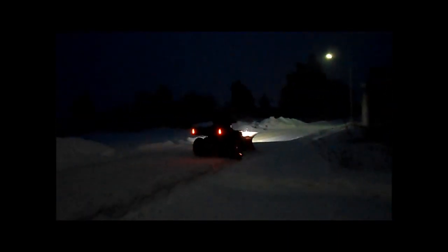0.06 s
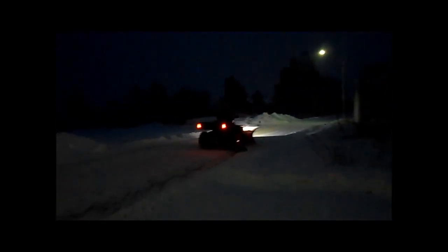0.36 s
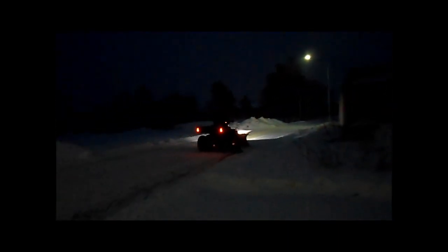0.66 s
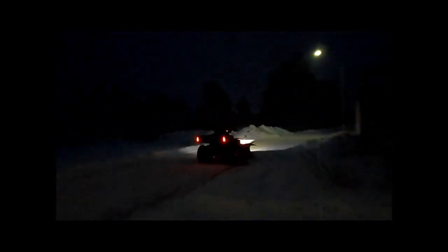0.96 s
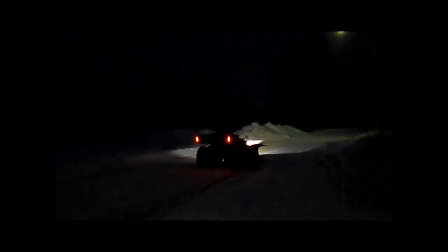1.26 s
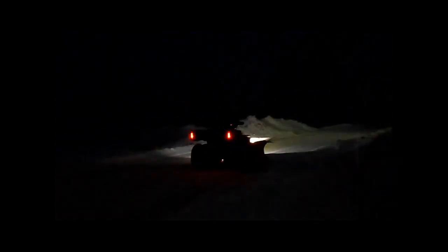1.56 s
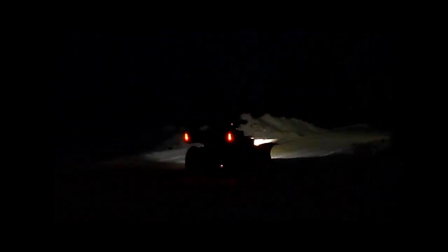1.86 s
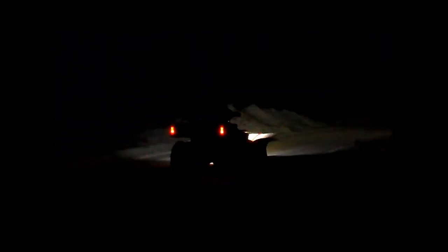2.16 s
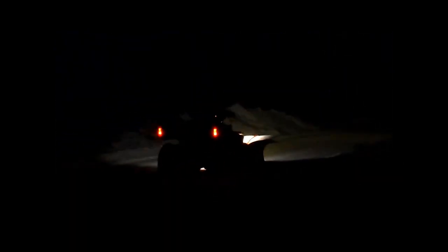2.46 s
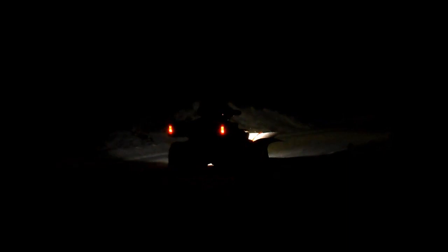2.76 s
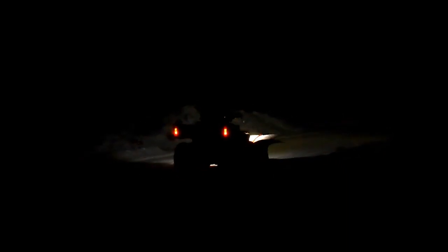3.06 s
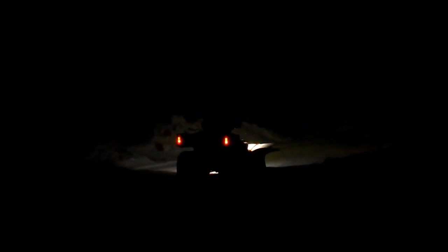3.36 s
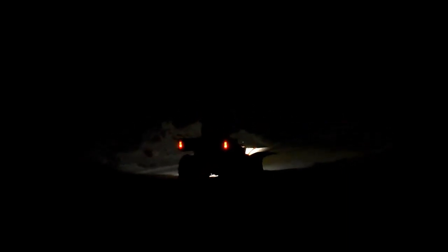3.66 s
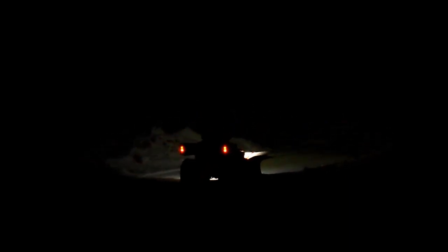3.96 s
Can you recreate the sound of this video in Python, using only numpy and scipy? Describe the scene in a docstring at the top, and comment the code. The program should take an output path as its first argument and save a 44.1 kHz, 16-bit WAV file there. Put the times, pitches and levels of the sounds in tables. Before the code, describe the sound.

An all-terrain vehicle drones steadily as its plow blade scrapes through packed snow.

```python
"""A snowy road at night: an all-terrain vehicle pushes a plow, heard from behind as it draws away.
Its single cylinder drones at a near-steady speed, one exhaust pulse per firing, over a tyre rumble.
The blade grinds and hisses through packed snow, snaps the crust and clanks on lumps of ice.
The treble drops out for a while in the middle; low thumps come just before the sound stops."""
import sys
import numpy as np
from scipy import signal
from scipy.fft import rfft, irfft
from scipy.io import wavfile
from scipy.ndimage import uniform_filter1d

SR = 44100
rng = np.random.default_rng(int(sys.argv[2]) if len(sys.argv) > 2 else 0)


def log_audio(samples):
    """Write samples as a 16-bit WAV file to the path given in sys.argv[1]."""
    # one column per channel
    frames = np.atleast_2d(samples).T
    # limit to full scale, then quantise
    limited = np.clip(frames, -1, 1)
    pcm = np.round(limited * 32767).astype(np.int16)
    wavfile.write(sys.argv[1], SR, pcm)


N = 176400
T = np.arange(N) / SR
HZ = np.fft.rfftfreq(N, 1 / SR)

# fade of engine and tyres as the vehicle draws away: time_s, level_db
VEHICLE_LEVEL = [(0, -24.5), (.25, -24), (.55, -26), (1.15, -26.5), (1.9, -27), (2.7, -28.5), (3.2, -30),
                 (3.9, -29.5)]
# bite of the blade, riding the hiss and the crackle: time_s, level_db
BITE_LEVEL = [(0, -46.5), (.05, -40), (.12, -39.5), (.21, -37.5), (.28, -35.5), (.32, -39.5), (.42, -32),
              (.48, -40), (.59, -41.5), (.65, -35.5), (.72, -38), (.98, -38.5), (1.22, -40.5),
              (1.36, -41.5), (1.48, -34), (1.62, -39.5), (1.83, -41.5), (2.15, -42.5), (2.36, -41),
              (2.45, -41), (2.68, -35.5), (2.95, -37.5), (3.07, -36), (3.27, -36.5), (3.35, -39.5),
              (3.39, -35), (3.55, -35), (3.62, -37), (3.67, -34.5), (3.76, -38.5), (3.86, -37)]
# brightness of the snow, lifting the top of the hiss and the crackle: time_s, lift_db
SNOW_BRIGHTNESS = [(0, 6), (.8, 2.5), (2.7, 0), (3.1, -1), (3.75, -3), (3.9, 3)]


def engine():
    """One pulse per firing booms through the silencer, with rough puffs at exhaust and intake."""
    # engine speed: time_s, firing_rate_hz
    speed = [(0, 33.47), (.3, 33.25), (.7, 33.12), (.85, 32.85), (1.0, 33.12), (1.3, 33.33), (1.8, 33.48),
             (2.48, 33.48), (2.6, 34.15), (2.73, 33.47), (2.88, 33.75), (3.05, 33.47), (3.9, 33.5)]
    # colour of the gas puffs: frequency_hz, gain_db
    puff_colour = [(30, -15), (90, -4), (118, 2.5), (140, -7), (205, -7), (245, 3.5), (300, -6),
                   (380, -19.5), (600, -28.5), (1200, -58)]
    start_cycles, intake_lag_cycles, intake_db = 0.92, 0.65, -3
    jitter_s, boom_scatter_db = 0.0001, 0.55
    puff_db, puff_scatter_db, puff_decay_s = -11.5, 1.1, 0.0068
    rate = curve(speed)
    fired = np.flatnonzero(np.diff(np.floor(np.cumsum(rate) / SR + start_cycles)))
    late, size, gust, gulp = rng.standard_normal((len(fired), 4)).T
    jittered = np.clip(fired + np.round(late * jitter_s * SR).astype(int), 0, N - 1)
    intakes = np.minimum(fired + (intake_lag_cycles * SR / rate[fired]).astype(int), N - 1)
    firings, gusts = np.zeros((2, N))
    firings[jittered] = amp(boom_scatter_db * size)
    gusts[fired] = amp(puff_scatter_db * gust)
    gusts[intakes] = amp(intake_db + puff_scatter_db * gulp)
    boom = unit(signal.fftconvolve(firings, silencer_pulse(rate.mean()))[:N])
    puffs = colour(noise_bursts(gusts, puff_decay_s), puff_colour)
    return amp(curve(VEHICLE_LEVEL)) * (boom + amp(puff_db) * puffs)


def silencer_pulse(firing_hz):
    """One exhaust pulse; a silencer chamber delays the part near its resonance."""
    # colour of the pulse: multiple_of_firing_rate, gain_db
    exhaust_colour = [(1, -5.5), (2, -3), (3, 3), (4, -4.5), (5, -3.5), (6, -11.5), (7, -11.5), (8, -19),
                      (9, -21.5), (10, -30.5), (12, -35), (14, -29.5)]
    chamber_hz, chamber_width_hz = 114.8, 24
    hz = np.fft.fftfreq(16384, 1 / SR)
    order = abs(hz) / firing_hz
    chamber = np.exp(-2j * np.arctan2(hz * chamber_width_hz, chamber_hz ** 2 - hz ** 2))
    gain = gains(exhaust_colour, order) * np.minimum(order, 1) ** 2 / (1 + (order / 16) ** 8)
    minimum_phase = np.exp(np.conj(signal.hilbert(np.log(gain + 1e-5))))  # front-loads the punch
    return -np.fft.ifft(chamber * minimum_phase).real[:8192]


def scrape():
    """Snow crumbles under the sticking, slipping blade: a grind, a hiss and a light rattle of steel."""
    # colour of packed snow grinding: frequency_hz, gain_db
    grind_colour = [(150, -0.5), (330, -1), (450, -1), (570, -8.5), (700, -2), (860, 1), (1050, -0.5),
                    (1280, 0.5), (1700, -5), (2050, -4), (2350, -15), (3200, -9), (6000, -48)]
    # swells of the grind: time_s, level_db
    grind_level = [(0, -37), (.06, -33), (.19, -36), (.205, -26.5), (.27, -29), (.31, -33.5), (.36, -30),
                   (.44, -30), (.51, -38), (.7, -35), (.8, -37.5), (1.38, -38.5), (1.5, -35), (1.6, -39),
                   (1.95, -39.5), (2.56, -36), (2.95, -39.5), (3.05, -36.5), (3.8, -39), (3.87, -36)]
    # colour of snow sliding off the blade: frequency_hz, gain_db
    hiss_colour = [(800, -17.5), (2000, -2.5), (2350, 1), (2620, 0.5), (2950, 2.5), (3330, -3),
                   (3650, -0.5), (4100, 2), (5000, -5.5), (6000, -8), (6950, -14), (7500, -4),
                   (9600, -13.5), (10300, -20), (11000, -52.5)]
    chatter_hz, grind_chatter_db, hiss_chatter_db = 43.7, 1.04, 1.4
    hiss_trim_db, treble_hz = -3.5, 3850
    rattles_per_s, rattle_db, spots = 47, -46.5, 6
    chatter = wander(chatter_hz)
    packed, loose = crumbs(), patchy(crumbs())
    grind = colour(packed, grind_colour) * amp(curve(grind_level) + grind_chatter_db * chatter)
    hiss = colour(loose, hiss_colour) * amp(curve(BITE_LEVEL) + hiss_trim_db + hiss_chatter_db * chatter)
    top = irfft(rfft(hiss) * (1 - 1 / (1 + (HZ / treble_hz) ** 8)), N)
    hiss += top * (amp(curve(SNOW_BRIGHTNESS)) - 1)
    rattle = sum(blade_ring(clicks(rattles_per_s / spots, spread_db=2)) for _ in range(spots))
    return grind + hiss + amp(rattle_db) * unit(rattle)


def crumbs(per_s=2500, power_share=0.24):
    """Crumbling snow: dense tiny clicks in a bed of smooth noise."""
    grains = unit(clicks(per_s, spread_db=1))
    return np.sqrt(power_share) * grains + np.sqrt(1 - power_share) * rng.standard_normal(N)


def ice_knocks():
    """Each lump of ice gives a short crunch that rings the blade."""
    # blade hitting ice: start_s, level_db, decay_s, centre_hz, ring_db
    hits = [(0.202, -28, 0.0078, 1400, -14), (0.411, -19, 0.0074, 3700, -5),
            (0.637, -29.5, 0.0093, 4400, -9), (1.092, -28.5, 0.0073, 1880, -11),
            (1.426, -34, 0.02, 3000, -6), (1.467, -23.5, 0.0086, 3200, -12),
            (1.933, -32, 0.0083, 2900, -11), (2.115, -29, 0.015, 3800, -15),
            (2.165, -28.5, 0.0034, 2520, -5), (2.221, -26.5, 0.0037, 2530, -4),
            (2.425, -34, 0.024, 2740, -3.5), (2.499, -27.5, 0.0079, 4030, -11),
            (2.545, -26, 0.017, 2440, -15), (2.612, -36, 0.0064, 2600, 0), (2.652, -30, 0.0051, 2320, -6),
            (2.745, -34, 0.007, 2580, 1.5), (2.85, -36, .009, 2650, 0.5), (3.007, -22, 0.0037, 3150, 1),
            (3.14, -34, 0.0039, 2600, 2.5), (3.19, -35, 0.0046, 3400, 2.5),
            (3.498, -34.5, 0.0074, 2550, -1), (3.531, -32, .006, 2950, -8), (3.66, -29, 0.0074, 3180, -5.5),
            (3.847, -31.5, 0.016, 2550, -4.5)]
    attack_s, crunch_db = 0.0018, -4.5
    out, t = np.zeros(N + SR), T[:SR // 4]
    hz = np.fft.rfftfreq(len(t), 1 / SR)
    for start_s, level_db, decay_s, centre_hz, ring_db in hits:
        envelope = (1 - np.exp(-t / attack_s)) * np.exp(-t / decay_s) * 2
        width_octaves = 0.17 + 34 * decay_s  # longer crunches are broader
        band = 1 / (1 + (np.log2((hz + 1) / centre_hz) / width_octaves) ** 4) ** .5
        crunch = irfft(rfft(envelope * rng.standard_normal(len(t))) * band, len(t))
        clank = amp(crunch_db) * unit(crunch) + amp(ring_db) * unit(blade_ring(crunch))
        out[round(start_s * SR):][:len(t)] += amp(level_db) * np.sqrt(np.mean(envelope ** 2)) * clank
    return out[:N]


def blade_ring(strike, spot_scatter_db=1, detune=0.005):
    """The steel rings: each spot struck favours other modes, and the snow load shifts their pitch."""
    # modes of the blade: pitch_hz, level_db, t60_s
    modes = [(870, -9, .054), (1324, -3, 0.089), (1525, 1.5, 0.096), (1943, -5, 0.065), (2605, 3, 0.1),
             (3320, -8.5, 0.046), (3327, 6, 0.059), (3775, 0, 0.054), (4350, -2.5, 0.058), (4610, 2, 0.039)]
    t = T[:SR // 8]
    spot_db = spot_scatter_db * rng.standard_normal(len(modes))
    body = np.zeros(len(t))
    for (pitch_hz, level_db, t60_s), lift_db in zip(modes, spot_db):
        loaded_hz = pitch_hz * (1 + detune * rng.standard_normal())
        body += amp(level_db + lift_db - 60 * t / t60_s) * np.sin(2 * np.pi * loaded_hz * t)
    return signal.fftconvolve(strike, body / np.linalg.norm(body))[:len(strike)]


def crust_crackle(snaps_per_s=110, decay_s=0.0058, trim_db=-10.5):
    """The crust snaps in short bursts, more strongly when the blade bites."""
    # colour of the snaps: frequency_hz, gain_db
    snap_colour = [(600, -3), (2000, 0.5), (4200, 4), (5800, -4), (7000, -2.5), (7800, -5.5), (9700, -0.5),
                   (11000, -27)]
    snaps = noise_bursts(abs(clicks(snaps_per_s, spread_db=-3.5)), decay_s)
    return colour(snaps, snap_colour) * amp(curve(BITE_LEVEL) + 2 * curve(SNOW_BRIGHTNESS) + trim_db)


def thumps(pitch_hz=86.4, rise_s=0.0048):
    """Dull, quickly damped bumps."""
    # low bumps: start_s, level_db
    bumps = [(3.836, -18), (3.864, -26), (3.901, -16.5)]
    out = np.zeros(N)
    for start_s, level_db in bumps:
        t = np.maximum(T - start_s, 0)
        envelope = t / rise_s * np.exp(1 - t / rise_s)
        out -= amp(level_db) * envelope * np.sin(2 * np.pi * pitch_hz * t)
    return out


def tyres(below_drone_db=13):
    """A bed of tyre and air rumble that recedes with the vehicle."""
    # colour of the rumble: frequency_hz, gain_db
    rumble_colour = [(10, -11.5), (25, -7), (45, -1.5), (70, -5.5), (180, 1.5), (220, -8), (400, -31.5),
                     (600, -27.5), (1500, -52)]
    return amp(curve(VEHICLE_LEVEL) - below_drone_db) * colour(rng.standard_normal(N), rumble_colour)


def amp(db):
    """Decibels to gain."""
    return 10 ** (np.asarray(db) / 20)


def unit(x):
    """Scales to rms 1."""
    return x / np.sqrt(np.mean(x ** 2) + 1e-20)


def curve(points, times=T):
    """An automation curve: straight lines between breakpoints."""
    return np.interp(times, *np.transpose(points))


def gains(points, hz):
    """An EQ curve read on a log-frequency axis."""
    f, db = np.transpose(points)
    return amp(np.interp(np.log(hz + 1), np.log(f + 1), db))


def colour(x, points):
    """Sends x through an EQ curve, at rms 1."""
    return unit(irfft(rfft(x) * gains(points, HZ), N))


def wander(hz):
    """Random modulation up to about hz, at rms 1."""
    slope = HZ / (HZ + 3) / (1 + (HZ / hz) ** 4) / np.sqrt(HZ + 8)
    return unit(irfft(rfft(rng.standard_normal(N)) * slope, N))


def clicks(per_s, spread_db):
    """Random clicks; a few stand out, or sink back if spread_db is negative."""
    ticks = (rng.random(N) < per_s / SR) * rng.choice([-1, 1], N)
    return ticks * amp(spread_db * np.minimum(rng.exponential(1, N), 4))


def noise_bursts(triggers, decay_s):
    """Each trigger opens a decaying burst of noise."""
    envelope = signal.lfilter([1], [1, -np.exp(-1 / (decay_s * SR))], triggers)
    return envelope * rng.standard_normal(N)


def patchy(x, depth_db=3):
    """Lifts and lowers x in small random patches of time and frequency."""
    spectra = signal.stft(x, nperseg=256)[2]
    patches = uniform_filter1d(rng.standard_normal(spectra.shape), size=4, axis=0)
    patches = uniform_filter1d(patches, size=7, axis=1)
    return signal.istft(spectra * amp(depth_db * unit(patches)), nperseg=256)[1][:N]


def scene():
    """Engine, tyres and plow in the open air, in mono."""
    return (engine() + tyres() + scrape() + crust_crackle() + ice_knocks() + thumps())[None]


def record(dry):
    """The treble drops out for a stretch over a faint hiss; the band is limited; the sound stops short."""
    # where the treble ends while muffled: time_s, cutoff_hz
    muffle_edge = [(.9, 4330), (1.1, 4720), (1.45, 4260), (1.475, 5400), (1.505, 4600), (1.65, 4580),
                   (1.85, 3650), (2.12, 4370), (2.3, 3980), (2.5, 4460)]
    muffle_from_s, muffle_to_s, muffle_db = 0.855, 2.61, -19.5
    floor_db, top_hz = -69, 10850
    stop_s, drop_db, fade_db_per_s = 3.928, -30.5, 710
    hz, t, spectra = signal.stft(dry, SR, nperseg=256)
    lows = 1 / (1 + (hz[:, None] / curve(muffle_edge, t)) ** 30)
    muffled = (t > muffle_from_s) & (t < muffle_to_s)
    sound = signal.istft(spectra * (lows + (1 - lows) * amp(muffle_db * muffled)), SR)[1][:, :N]
    sound += amp(floor_db) * rng.standard_normal(N)
    sound *= amp((T > stop_s) * (drop_db - fade_db_per_s * (T - stop_s)))
    lowpass = signal.firwin(255, top_hz, window=("kaiser", 9), fs=SR)
    return signal.oaconvolve(sound, lowpass[None], "same")


dry = scene()
out = record(dry)
log_audio(out)
```